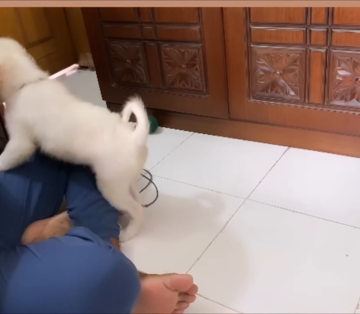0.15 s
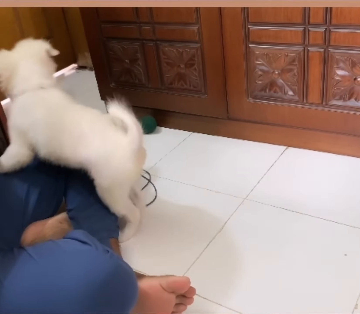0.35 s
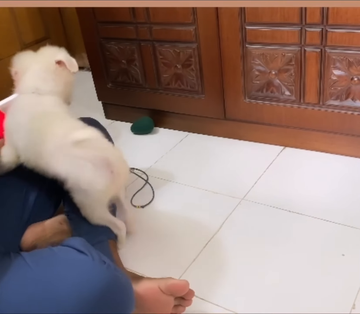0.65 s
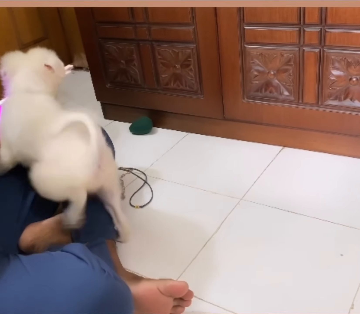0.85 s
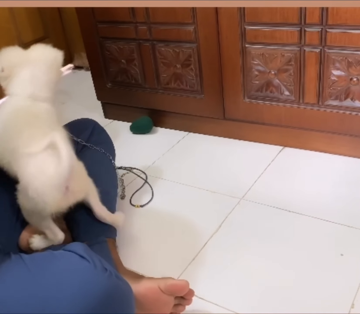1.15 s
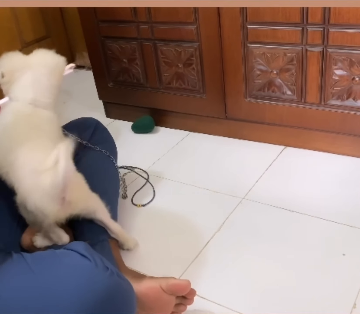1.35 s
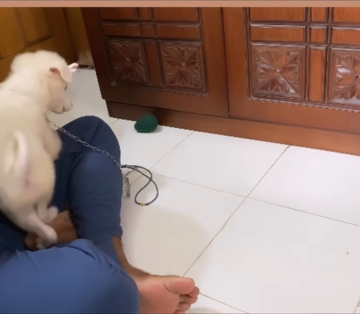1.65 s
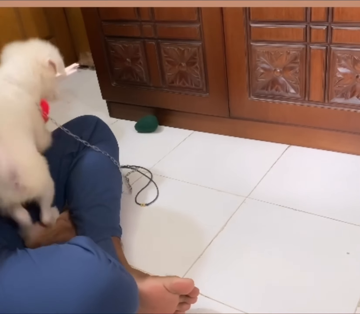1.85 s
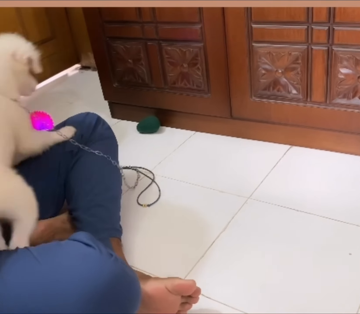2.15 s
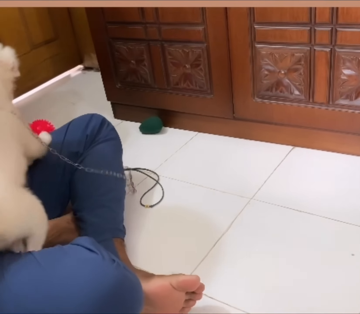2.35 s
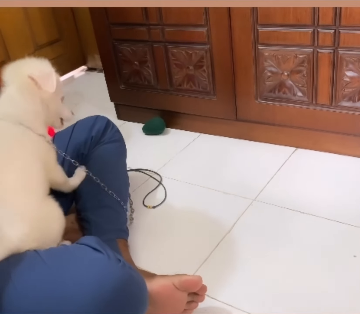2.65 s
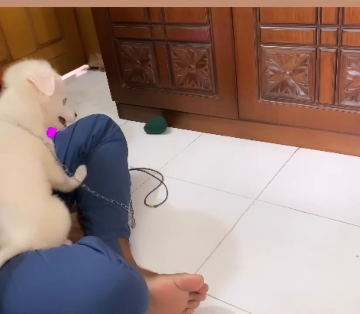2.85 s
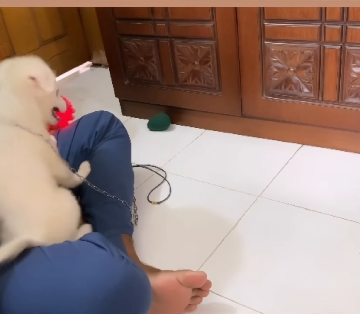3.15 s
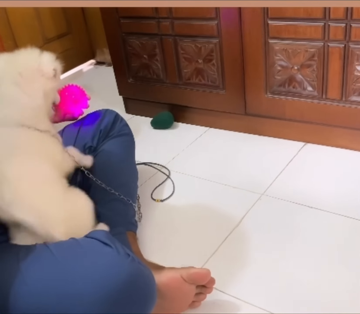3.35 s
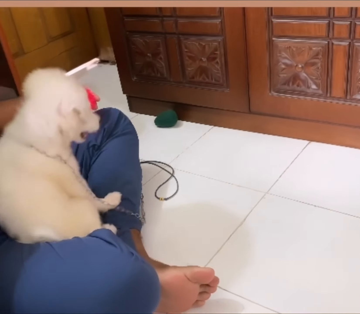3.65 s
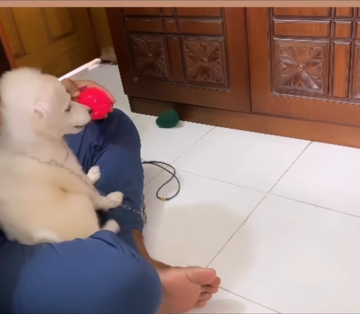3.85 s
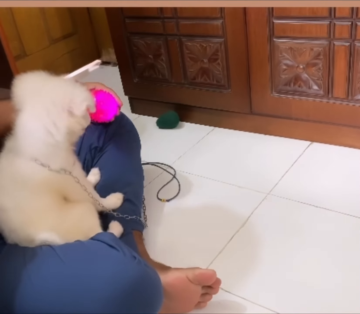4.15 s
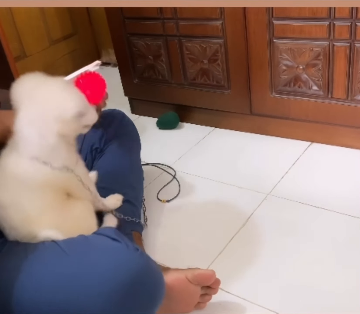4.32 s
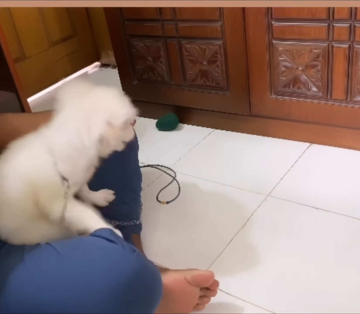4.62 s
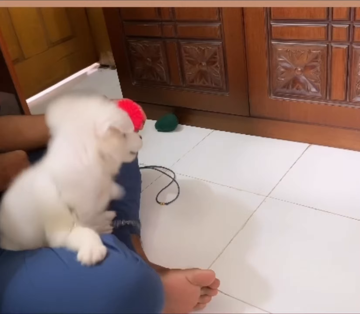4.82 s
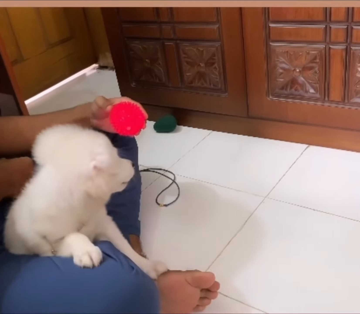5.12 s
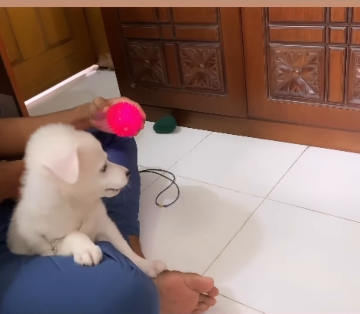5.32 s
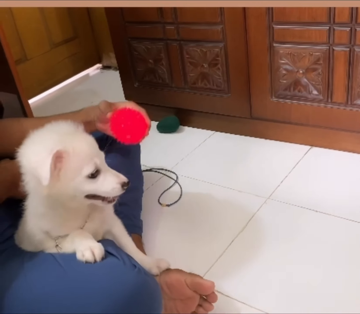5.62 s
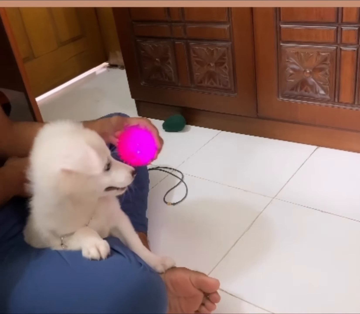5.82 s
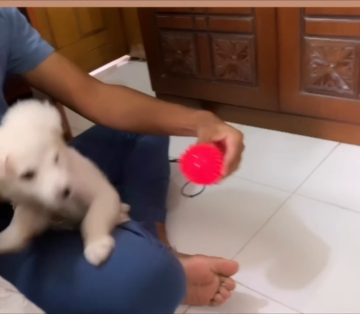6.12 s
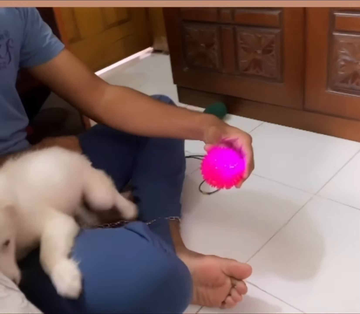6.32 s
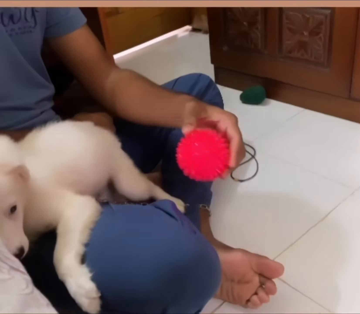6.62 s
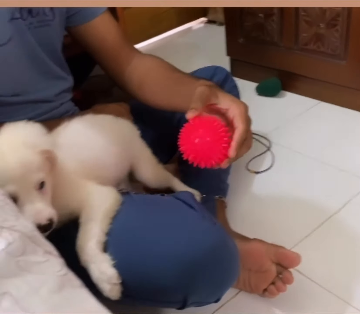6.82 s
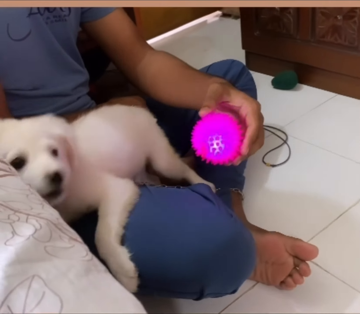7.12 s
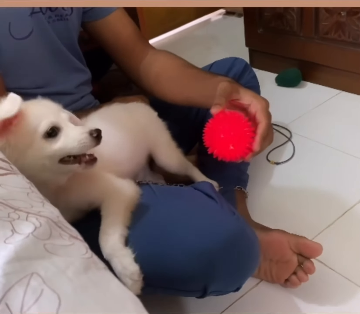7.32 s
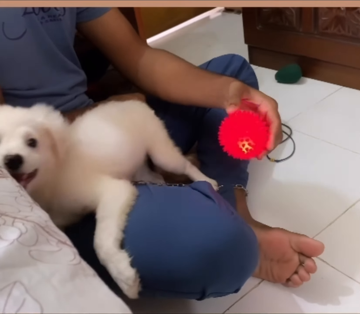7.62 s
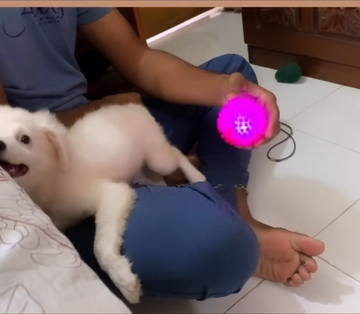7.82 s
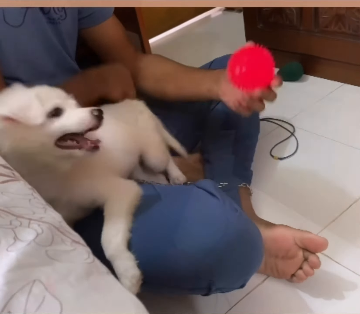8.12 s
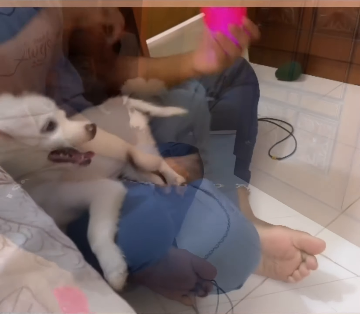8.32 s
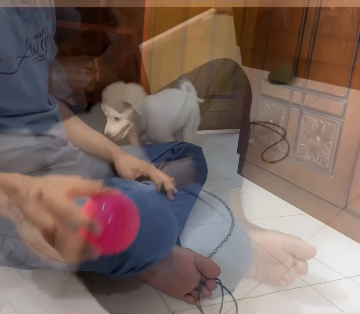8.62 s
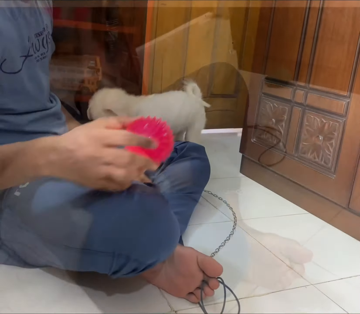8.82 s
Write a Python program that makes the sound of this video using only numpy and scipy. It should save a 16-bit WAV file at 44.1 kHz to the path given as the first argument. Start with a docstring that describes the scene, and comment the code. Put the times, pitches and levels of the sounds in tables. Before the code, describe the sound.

A rubber squeaky ball gives six loud, reedy two-part squeaks, high then lower, over soft puppy thumps and shuffles in a quiet tiled room.

```python
"""A rubber ball squeaks six times, high as it is squeezed and lower as it refills, close to the microphone.
Each squeak is a sum of gliding reed partials, coloured by its tube and echoed by the quiet tiled room.
A puppy clambers over a lap: pulsed low sines and shaped noise make the thumps, shuffles and rustle.
Steady filtered noise and a faint drone are the room, which widens late, near one light tap.
A limiter holds the squeaks down, and everything under them ducks too."""
import sys
import numpy as np
from scipy import signal
from scipy.fft import rfft, irfft, next_fast_len
from scipy.io import wavfile
from scipy.ndimage import uniform_filter1d, minimum_filter1d, map_coordinates

SR = 44100
rng = np.random.default_rng(int(sys.argv[2]) if len(sys.argv) > 2 else 0)


def dump(signal):
    """Clip the signal to [-1, 1] and save it as 16-bit WAV at the path in sys.argv[1]."""
    limited = np.clip(np.atleast_2d(signal).T, -1, 1)
    pcm = np.round(limited * 32767).astype(np.int16)
    wavfile.write(sys.argv[1], SR, pcm)


N = 395577
TIME = np.arange(N) / SR
TOP_HZ = 15900  # band limit of the reed partials and of the whole take


def amp(db):
    """Decibels to linear gain."""
    return 10 ** (np.asarray(db) / 20)


def unit(x):
    """Scale x to an rms of 1."""
    return x / np.sqrt(np.mean(x ** 2) + 1e-20)


def along(points, hz):
    """Read (hz, value) points at any frequency, on a log frequency axis."""
    point_hz, value = np.transpose(points)
    return np.interp(np.log(hz + 1), np.log(point_hz + 1), value)


def over_time(points):
    """Read (time_s, level_db) points at every sample, still in dB."""
    return np.interp(TIME, *np.transpose(points))


def wobble(rate, size=N):
    """A smooth random curve with `rate` knots a second."""
    knots = rng.standard_normal(int(size * rate / SR) + 4)
    return map_coordinates(knots, [np.arange(size) * rate / SR])


def filtered(x, response):
    """Multiply the spectrum of x by a function of frequency in Hz."""
    size = next_fast_len(N + SR // 2)  # spare length keeps late echoes from wrapping round
    hz = np.fft.rfftfreq(size, 1 / SR)
    return irfft(rfft(x, size) * response(hz), size)[..., :N]


def noise(spectrum):
    """White noise coloured by (hz, level_db) points, then set to an rms of 1."""
    return unit(filtered(rng.standard_normal(N), lambda hz: amp(along(spectrum, hz))))


def add(track, s, sound):
    """Mix a sound into the track from time s."""
    part = track[max(round(s * SR), 0):][:len(sound)]
    part += sound[:len(part)]


# Colour of the steady room noise; only its shape counts: hz, level_db
ROOM_NOISE_COLOUR = [(20, -11), (55, -0.5), (120, -6), (220, -2.5), (340, -8), (460, -10.5), (570, -17.5),
                     (800, -14.5), (1150, -19), (2100, -28), (3800, -33.5), (5800, -48.5), (9500, -51),
                     (15500, -64.5)]
# Level of the room noise through the take: time_s, level_db
ROOM_NOISE_LEVEL = [(0, -33), (5, -32), (8.2, -31), (8.97, -28)]
# How far the room noise opens out, against its centre: time_s, side_db
ROOM_NOISE_WIDTH = [(8.1, -56), (8.4, -17.5), (8.9, -9.5)]
# Faint drone in the room, middle level of each wavering tone: pitch_hz, level_db
DRONE_TONES = [(157, -38.5), (249, -44), (338, -43.5), (443, -50.5)]


def background():
    """Steady room noise, with a side signal of opposite signs that widens it at the end, and a wavering drone."""
    side = amp(over_time(ROOM_NOISE_WIDTH)) * noise(ROOM_NOISE_COLOUR)
    stereo_noise = noise(ROOM_NOISE_COLOUR) + np.array([side, -side])
    drone = np.zeros(N)
    for pitch_hz, level_db in DRONE_TONES:
        phase = 2 * np.pi * pitch_hz * TIME + 3.6 * wobble(7)
        drone += amp(level_db + 2.7 * wobble(4)) * np.sin(phase)
    return amp(over_time(ROOM_NOISE_LEVEL)) * stereo_noise + drone


# Soft bumps of paws, knees and hands, levels before the trims below: start_s, level_db, pitch_hz
BUMPS = [(0.367, -15, 111), (2.279, -22, 80), (2.765, -19, 60), (2.912, -21, 80), (3.139, -17.5, 76),
         (3.223, -18, 56), (3.375, -14, 99.4), (3.454, -16.5, 66.6), (3.495, -14.5, 54.7),
         (3.593, -11.5, 84), (3.619, -17.5, 136), (3.726, -10, 64.4), (4.136, -12, 80),
         (4.355, -20.5, 111.4), (4.969, -17.5, 139), (5.565, -17, 67), (6.087, -14.5, 57), (6.569, -23, 56),
         (8.289, -18.5, 58), (8.409, -17.5, 70), (8.934, -15.5, 70)]
# Colour of the noise in each bump; only its shape counts: hz, level_db
THUD_COLOUR = [(20, -10), (50, -4.5), (110, -1), (200, -3.5), (320, -14.5), (600, -27.5), (2000, -43),
               (6000, -83.5)]
# Bodies shifting, before the trim and swing below: time_s, level_db
SHUFFLE_LEVEL = [(0.0, -35), (0.45, -33.5), (1.0, -41.5), (2.25, -35.5), (2.45, -35), (3.1, -32),
                 (3.52, -23.5), (3.82, -27), (4.22, -27), (4.65, -39.5), (5.52, -41), (5.64, -33),
                 (6.17, -38), (7.29, -31), (7.82, -36), (8.52, -25.5), (8.67, -30), (8.97, -31)]
# Colour of the shifting and settling; only its shape counts: hz, level_db
RUMBLE_COLOUR = [(10, -28.5), (28, -7), (50, 1), (100, -4.5), (160, -12), (300, -20.5), (700, -46),
                 (2000, -89)]
# Cloth rustle, before its random swing: time_s, level_db
CLOTH_LEVEL = [(8.1, -96.5), (8.3, -67.5), (8.55, -73), (8.68, -59), (8.8, -64), (8.87, -60), (8.97, -64)]
# Colour of the rustle; only its shape counts: hz, level_db
FABRIC_COLOUR = [(300, -11), (2000, 7), (6000, -2.5), (10000, -5), (15000, -10.5)]
SHUFFLE_TRIM_DB, FIDGET_DB, FIDGETS_PER_S = -1, 3, 9  # trim of the shuffle curve, and its random swing
SETTLE_DB, SETTLE_S = -13.5, .04  # rumble against each bump's level, and its time to swell


def puppy():
    """Padded contacts push out a low tone and dull noise, bodies settle and shift, and cloth brushes past."""
    bumps, contacts, settling = np.zeros(N), np.zeros(N), np.zeros(N)
    t = np.arange(SR // 4) / SR
    push = (t / 0.012 * np.exp(1 - t / 0.013)) ** 2  # a padded contact swells and dies
    settle = t / SETTLE_S * np.exp(1 - t / SETTLE_S)
    for start_s, level_db, pitch_hz in BUMPS:
        add(bumps, start_s, amp(level_db - 2.5) * push * np.sin(2 * np.pi * pitch_hz * t))
        add(contacts, start_s, amp(level_db - 7) * push)
        add(settling, start_s, amp(level_db + SETTLE_DB) * settle)
    fidget_db = FIDGET_DB * wobble(FIDGETS_PER_S)
    shifting = amp(over_time(SHUFFLE_LEVEL) + SHUFFLE_TRIM_DB + fidget_db)
    shuffle = np.hypot(shifting, settling) * noise(RUMBLE_COLOUR)
    rustle = amp(over_time(CLOTH_LEVEL) + 2.8 * wobble(35)) * noise(FABRIC_COLOUR)
    return bumps + contacts * noise(THUD_COLOUR) + shuffle + rustle


def arch(stroke, opens_hz, stalls_hz, fall_power):
    """(time_s, pitch_hz) of a stroke: pressure lifts the pitch from the reed's opening to a top, then it sinks."""
    start_s, rise_s, fall_s, top_hz, hesitation = stroke
    u = np.linspace(0, 1, 100)
    rise = top_hz - (top_hz - opens_hz) * (1 - u ** hesitation) ** 2
    fall = top_hz - (top_hz - stalls_hz) * u ** fall_power
    times = start_s + np.append(rise_s * u, rise_s + fall_s * u)
    return np.transpose([times, np.append(rise, fall)])


def causal(tone):
    """Frequencies and complex log gain of a passive body: its phase follows from its colour."""
    hz = np.fft.fftfreq(4096, 1 / SR)
    log_gain = np.conj(signal.hilbert(np.log(amp(along(tone, abs(hz))))))
    return hz[hz >= 0], log_gain[hz >= 0]


def reed(rows, tone, tilt_db, attack, fade, droop_hz, scoop_hz, jitter, rasp, flutter_db, sag_db):
    """One squeak: the reed chops the air once a cycle, faster under more pressure; its tube colours the pulses."""
    s, pitch_hz = np.transpose(rows)
    t = np.arange(s[0] - attack / 2, s[-1] + 0.029, 1 / SR)
    since_start = t - t[0]
    stall = np.maximum(t - s[-1] + fade, 0) / fade  # as the air runs out the reed goes flat and stops

    pitch = uniform_filter1d(np.interp(t, s, pitch_hz), size=400, mode="nearest")
    pitch = pitch - droop_hz * np.minimum(stall, 2) ** 2
    pitch = pitch - scoop_hz * np.exp(-since_start / .002)  # the first cycles are slow
    overblown = np.clip((pitch - 1215) / 50, 0, 1)  # the hardest squeeze makes the top of the tone rasp
    pitch = pitch * (1 + .002 * wobble(120, len(t)) + jitter * wobble(2200, len(t)))

    k = np.arange(1, 24)[:, None]  # partial numbers

    def each_partial(rate):
        """A separate wobble for every partial."""
        return np.array([wobble(rate, len(t)) for _ in k])

    hz = k * pitch
    partials = np.exp(np.interp(hz, *causal(tone))) * np.clip((TOP_HZ - hz) / 400, 0, 1)
    treble = np.clip((hz - 2200) / 4500, 0, 1)
    flutter = np.tanh(each_partial(70))  # the upper partials are the least steady
    partials = partials * amp(treble * (tilt_db + flutter_db * flutter))
    # a stalling reed closes softly
    partials = partials * amp(-8 * stall * np.clip((hz - 9000) / 3000, 0, 1))
    # the top builds up last
    partials = partials * amp(-20 * np.exp(-since_start / .008) * np.clip((hz - 10000) / 1500, 0, 1))
    partials = partials * np.exp(-1j * (hz / 4500) ** 2)  # the tube smears each pulse, treble last
    size = np.sqrt(np.sum(abs(partials) ** 2, axis=0) / 2)  # rms, used to even out the level

    raspy_band = np.exp(-((hz - 9200) / 1500) ** 2)
    scatter = (rasp + 0.83 * overblown) * raspy_band * each_partial(810)
    drift = np.clip((hz - 9000) / 2500, 0, 2) * each_partial(52.0)  # the top partials slip out of step
    phase = 2 * np.pi * np.cumsum(hz, axis=1) / SR + scatter + drift
    wave = np.sum(partials * np.exp(1j * phase), axis=0).real / size

    opening = np.clip(since_start / attack, 0, 1) ** 2
    # level change just after the reed opens: a dip if sag_db is positive, a lift if negative
    sag = sag_db * np.exp(-((t - s[0] - .012) / 0.011) ** 2)
    return t[0], wave * opening * amp(-sag - 17.2 * stall ** 2)


# Air pushed out; hesitation under 1 grabs at once, over 2 starts slowly. Pitch and level are before
# the reed's own movements: start_s, rise_s, fall_s, top_pitch_hz, hesitation, level_db, treble_tilt_db
SQUEEZES = [ (0.634, .080, .057, 1293, 2.54, -4, -1.5), (2.462, 0.037, 0.051, 1205, 0.98, -3, -2),
            (3.774, 0.059, 0.043, 1193, 0.61, -4, -2), (4.672, 0.029, 0.07, 1153, 1.05, -4, -1),
            (6.101, 0.071, 0.047, 1167, .68, -3.5, -2), (7.671, 0.035, 0.046, 1143, 0.73, -3.5, -2.5), ]
# Air drawn back in: start_s, rise_s, fall_s, top_pitch_hz, hesitation, level_db, treble_tilt_db
RELEASES = [ (0.797, 0.063, 0.072, 954, 0.86, -7.5, -1), (2.586, .025, .077, 868.5, 1.26, -10, -1.5),
            (3.906, 0.025, .087, 913, 1.1, -8.5, -1), (4.809, 0.039, 0.06, 901, 3.8, -9.5, -3.5),
            (6.256, 0.046, 0.064, 932, 1.7, -7, -1.5), (7.798, 0.022, .055, 837, 1.03, -9.5, -3.5), ]
# Colour of the squeaker as air goes out; only its shape counts: hz, level_db
OUT_TONE = [(900, -19.5), (1130, -17), (1350, -28), (2300, -19.5), (3400, -17.5), (4050, -23), (4650, -12),
            (5300, -18.5), (6050, -29), (6900, -13), (7600, -9.5), (9000, -16.5), (11200, -33.5),
            (15500, -48)]
# Colour of the squeaker as air comes in; only its shape counts: hz, level_db
IN_TONE = [(680, -13), (830, -16), (1450, -22), (2600, -23), (3300, -22), (4000, -27), (5300, -27),
           (6050, -55), (6700, -30), (7550, -15), (8600, -17.5), (10300, -28.5), (12000, -43), (15500, -46)]
OUT_OPENS_HZ, OUT_STALLS_HZ, OUT_FALL_POWER = 1052.5, 1001, 1.6  # the hand eases off in a rounded arch
IN_OPENS_HZ, IN_STALLS_HZ, IN_FALL_POWER = 808, 713.3, 0.99  # the rubber springs back at an even pace


def ball():
    """Each squeeze flicks the reed open and sounds it; each release sounds it with reversed polarity."""
    squeaks, flicks = np.zeros(N), np.zeros(N)
    t = np.arange(SR // 50) / SR
    flick_pulse = t / 0.00067 * np.exp(1 - t / 0.00095)
    for *stroke, level_db, tilt_db in SQUEEZES:
        glide = arch(stroke, OUT_OPENS_HZ, OUT_STALLS_HZ, OUT_FALL_POWER)
        start_s, wave = reed(glide, OUT_TONE, tilt_db, attack=0.0036, fade=0.021, droop_hz=25.53,
                             scoop_hz=242.4, jitter=0.00075, rasp=0.065, flutter_db=1.5, sag_db=9.5)
        add(squeaks, start_s, -amp(level_db) * wave)
        add(flicks, stroke[0], flick_pulse)
    for *stroke, level_db, tilt_db in RELEASES:
        glide = arch(stroke, IN_OPENS_HZ, IN_STALLS_HZ, IN_FALL_POWER)
        start_s, wave = reed(glide, IN_TONE, tilt_db, attack=.003, fade=0.035, droop_hz=9,
                             scoop_hz=61, jitter=0.0047, rasp=0.12, flutter_db=7.5, sag_db=-1.5)
        add(squeaks, start_s, amp(level_db) * wave)
    flick_colour = [(400, -17.5), (1400, -0.5), (5000, 0.0), (8000, -9.5), (11500, -24.0), (15000, -45)]
    return squeaks + amp(-13.5) * flicks * noise(flick_colour)


# Echoes off hand, floor and cupboard, close to the ball: hz, level_db
NEAR_SEND = [(800, -25.5), (3000, -15.5), (6000, -18), (9000, -12), (14000, -7.5)]


def near_echoes(x, count=10):
    """Close surfaces send back late copies that beat against the gliding partials."""
    delays_s = np.linspace(.002, .028, count) * rng.uniform(.85, 1.3, count)
    gains = np.exp(-delays_s / 0.017)

    def response(hz):
        """Sum of the delayed copies, coloured by the surfaces."""
        copies = sum(gain * np.exp(-2j * np.pi * hz * delay) for gain, delay in zip(gains, delays_s))
        return amp(along(NEAR_SEND, hz)) * copies / np.linalg.norm(gains)

    return filtered(x, response)


# Time for the room's ring to fall 60 dB: hz, decay_s
ROOM_DECAY = [(300, 0.87), (3000, 0.3), (8000, 0.35), (14000, 0.12)]
# Level of the squeaks sent into the room: hz, level_db
ROOM_SEND = [(500, -33), (4500, -28.5), (6200, -23.5), (8000, -24.5), (10500, -21), (15000, -19)]


def room(x):
    """Tiles and cupboard doors ring on, most in the treble: decaying noise convolved with the sound."""
    hz, t, z = signal.stft(rng.standard_normal(SR * 3 // 4), SR, nperseg=256)
    decay = amp(-60 * t / along(ROOM_DECAY, hz)[:, None])
    tail = signal.istft(z * decay, SR, nperseg=256)[1]
    tail = tail * np.clip(np.arange(len(tail)) / SR / 0.011, 0, 1)  # the ring fades in over 11 ms
    send = filtered(x, lambda hz: amp(along(ROOM_SEND, hz)))
    return signal.fftconvolve(send, tail / np.linalg.norm(tail))[:N]


# A light tap as the ball is moved, level before a 7 dB cut: start_s, level_db
TAPS = [(8.416, -24.5)]


def tap():
    """A small dull contact with no ring: a quickly dying burst of noise."""
    contact, t = np.zeros(N), np.arange(SR // 20) / SR
    for start_s, level_db in TAPS:
        add(contact, start_s, amp(level_db - 7) * np.exp(-t / 0.01))
    return contact * noise([(200, -8), (650, 4), (2000, -12), (7000, -47)])


def scene():
    """The ball close to the microphone, its echoes, the puppy and the room around them."""
    squeaks = ball()
    return background() + puppy() + squeaks + near_echoes(squeaks) + room(squeaks) + tap()


def record(dry, ceiling_db=-2.5):
    """A peak limiter ducks everything under the squeaks; nothing is kept above the band limit."""
    peak = np.max(abs(dry), axis=0)  # louder of the two channels
    needed = np.minimum(1, amp(ceiling_db) / (peak + 1e-9))
    gain = uniform_filter1d(minimum_filter1d(needed, size=300), size=200)
    return filtered(dry * gain, lambda hz: np.clip((TOP_HZ - hz) / 200 + .5, 0, 1))


dry = scene()
out = record(dry)
dump(out)
```